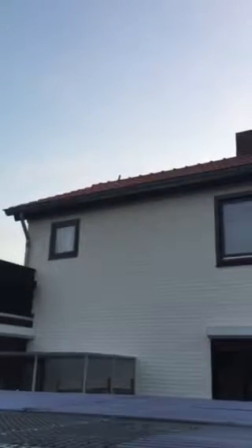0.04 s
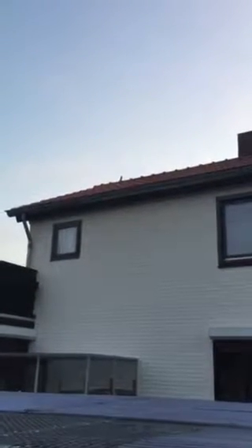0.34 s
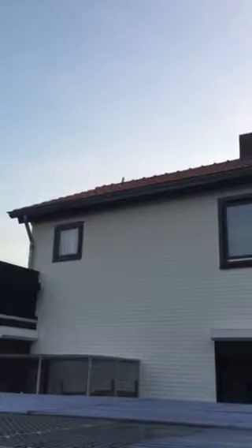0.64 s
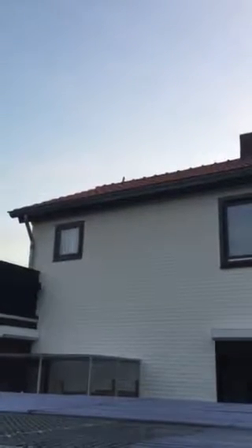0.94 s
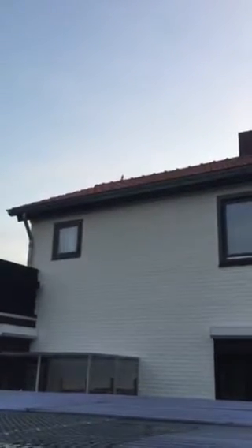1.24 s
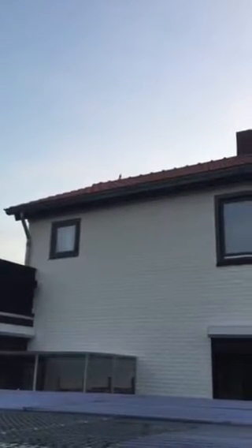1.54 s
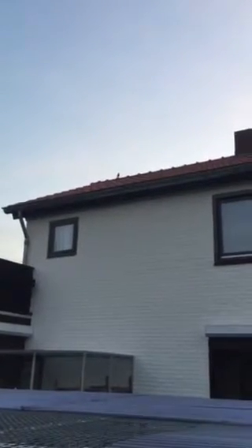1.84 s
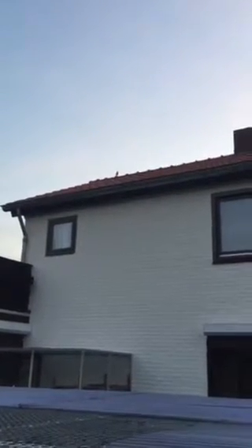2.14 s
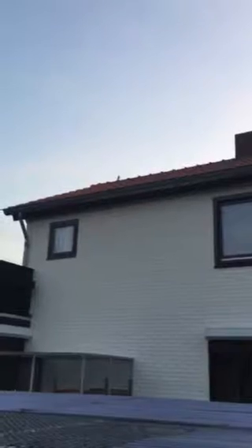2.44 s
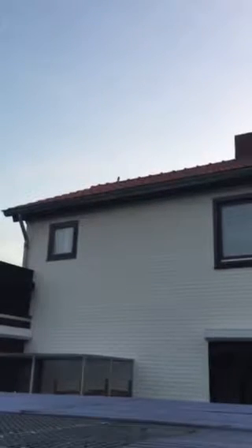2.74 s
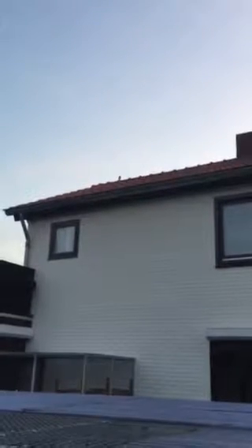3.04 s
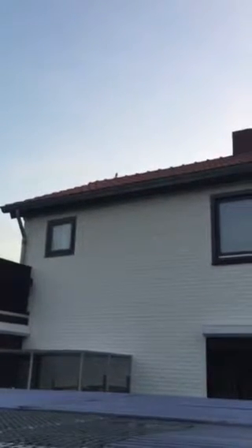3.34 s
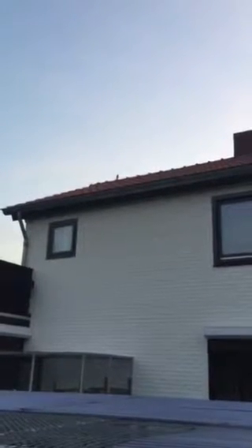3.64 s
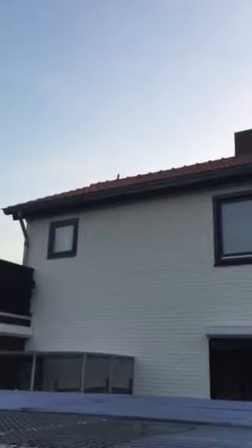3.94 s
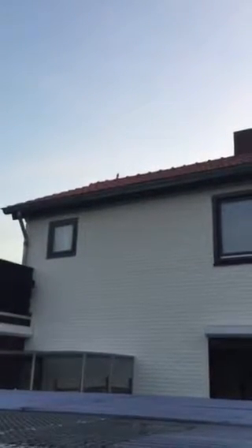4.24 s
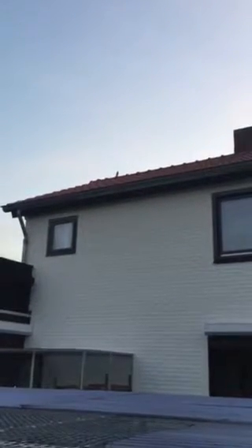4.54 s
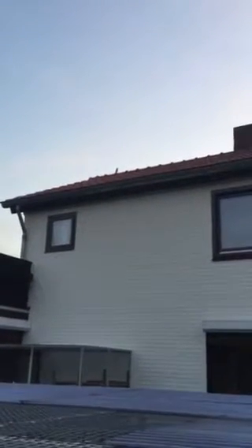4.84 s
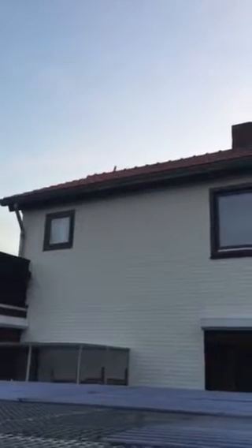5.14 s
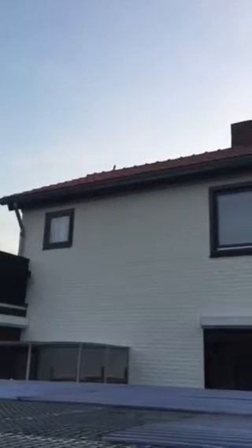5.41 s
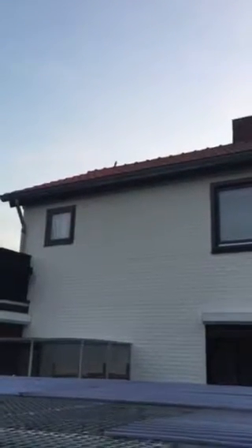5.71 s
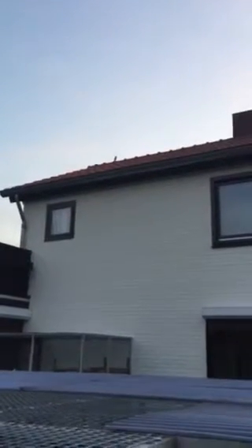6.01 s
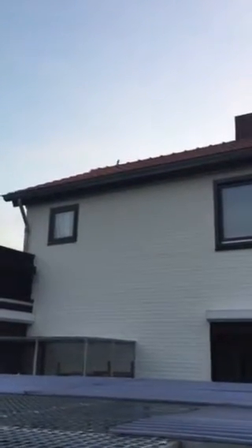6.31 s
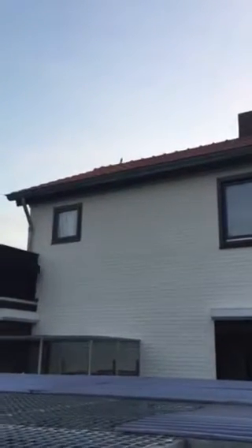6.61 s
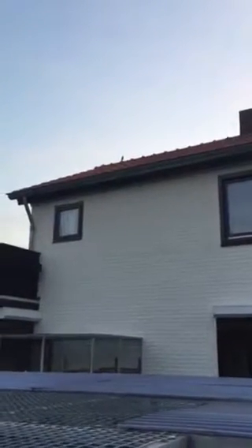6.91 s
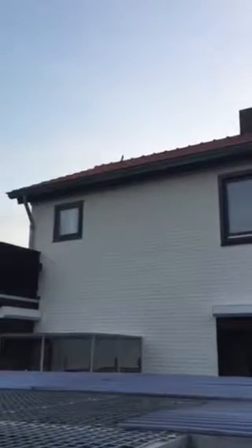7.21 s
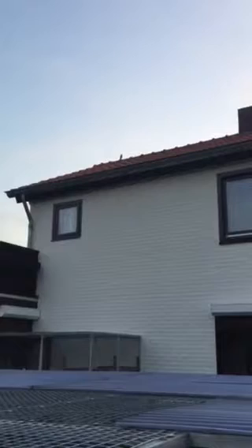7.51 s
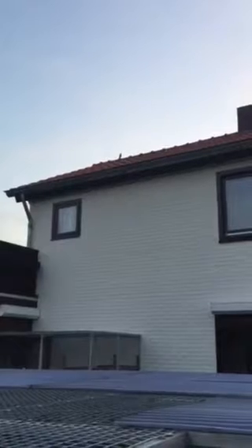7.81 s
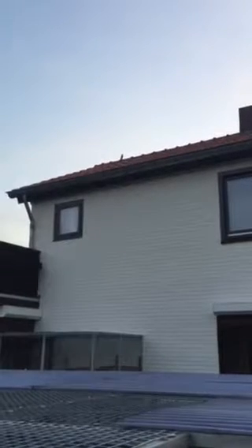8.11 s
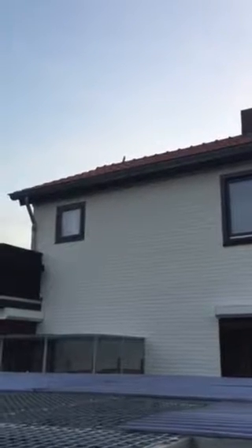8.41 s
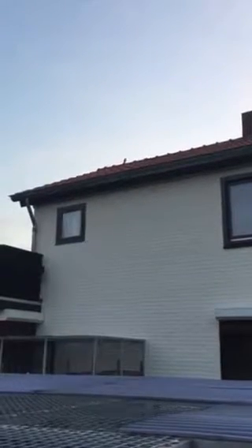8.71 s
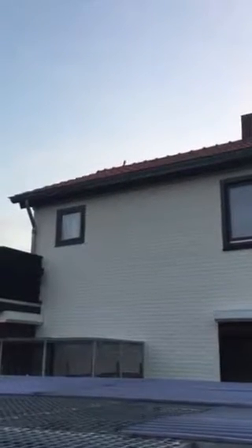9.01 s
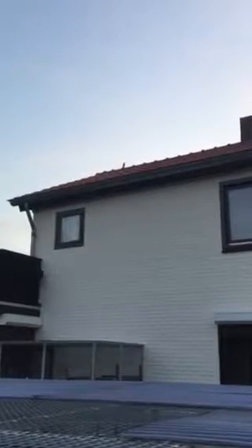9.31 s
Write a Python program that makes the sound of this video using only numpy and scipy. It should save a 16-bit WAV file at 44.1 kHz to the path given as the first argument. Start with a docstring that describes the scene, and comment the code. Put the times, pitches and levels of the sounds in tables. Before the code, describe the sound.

One songbird gives a varied song of whines, trills, chirps and soft whistles, lightly echoed by house walls, with a few dull bumps.

```python
"""A starling-like songbird on a house roof sings with the two sides of its syrinx, each an air-driven
oscillator. It opens with four nasal whines and a twitter, then twice sings rasps, a warble and chip trills.
Soft whistles enter; two runs of chirps climb into slurs and settle in a thin buzz; two hoots end the song.
Along the way come far purring notes, dull bumps on a hollow body and a faint scrape. Throughout, house
walls echo the song over the rumble of a quiet town."""
import sys
import numpy as np
from scipy import signal
from scipy.fft import rfft, irfft
from scipy.io import wavfile
from scipy.ndimage import uniform_filter1d

SR = 44100
rng = np.random.default_rng(int(sys.argv[2]) if len(sys.argv) > 2 else 0)


def to_wav(sig):
    """Store sig (one row per channel, or 1-D mono) as 16-bit WAV at the path in sys.argv[1].

    Samples outside -1..1 are clipped; the rate is SR.
    """
    pcm = np.clip(np.atleast_2d(sig), -1, 1) * 32767
    pcm = np.round(pcm).astype(np.int16)
    wavfile.write(sys.argv[1], SR, pcm.T)  # frames by channels


N = 417186
T = np.arange(N) / SR

# the motif of two rasps and a warble, sung twice: (start [s], level [dB])
MOTIFS = [(2.572, -1), (3.741, -2)]


def whines(push=3.6, brighten_db=6, flicker_db=2.2, onset_jitter=0.035, lock_s=0.06, coupling=0.2):
    """Source and filter: the throat shapes a buzzing tone that is rough until the membranes lock in."""
    # (start [s], crest [s], end [s], crest pitch [Hz], end pitch [Hz], bend of the fall [exponent],
    #  throat tuning [ratio], level [dB], second voice [dB])
    notes = [(.222, .34, .43, 915, 760, 2.6, 1.1, -48, -15), (.518, .62, .895, 1014, 815, 1.2, 1, -46, -10),
             (1.028, 1.145, 1.268, 944, 660, 2.7, 1.1, -48.5, -17),
             (1.378, 1.485, 1.675, 1002, 830, 1.6, 1, -46.5, -7)]
    # resonances of throat and beak: (frequency [Hz], gain [dB])
    throat = [(1000, -36), (1850, -11.5), (2600, -7), (3100, -5), (4150, -3.5), (5050, -18.5),
              (6200, -21.5), (7900, -17), (10300, -37.5), (12300, -22.5), (15000, -48)]
    out = np.zeros(N)
    for start, crest, end, top_hz, last_hz, bend, tuning, db, second_db in notes:
        t, hz = arch(start, crest, end, 0.76 * top_hz, top_hz, last_hz, bend)
        effort = hz / top_hz  # air pressure lifts pitch, loudness and brightness together
        stretch = tuning * effort ** 0.55  # the throat retunes for the lower five harmonics
        partials_db = []
        for k in range(1, 15):
            throat_db = 20 * np.log10(spectrum_gain(k * hz / (stretch if k < 6 else 1), throat))
            tilt_db = brighten_db * max(k - 4, 0) * (effort - 1)
            partials_db.append(throat_db + tilt_db + flicker_db * wander(len(t), 45))
        voice = syrinx(hz, partials_db, jitter=0.004 + onset_jitter * np.exp(-(t - start) / lock_s))
        second = syrinx(3880 * tuning * np.sqrt(effort), [second_db])
        voice += second * (1 + 2 * coupling * np.sin(phase_of(hz)))  # one side shakes the other
        roughness = 1 + 0.15 * wander(len(t), 500)
        add(out, start, voice * roughness * undb(db) * effort ** push * gate(t, 0.018))
    return out


def chirps(push=3.03, length_s=0.056, easy_hz=2320, easy_db=-59.5, db_per_octave=10):
    """Beating: two voices an octave apart slip out of tune on the rise, when slack and when forced."""
    # two climbing runs: (crest [s], nominal crest pitch [Hz], upper voice boost [dB], catch depth [0-1])
    notes = [(5.019, 1962, 10, 0.02), (5.15, 2230, -2, 0.08), (5.27, 2203, 3.5, 0.57),
             (5.387, 2113, 5.5, 0.1), (5.495, 2325, 18.5, 0), (5.581, 2524, 17.5, 0),
             (5.671, 2830, 18.5, 0.03), (6.856, 1950, 8.5, 0), (7.052, 2190, -7, 0.1),
             (7.209, 2320, 10.5, 0.96), (7.364, 2300, 9.5, 0.8), (7.478, 2200, 8, 0.07),
             (7.58, 2358, 13.5, 0.1), (7.67, 2572, 19.5, 0), (7.761, 2770, 19.5, 0)]
    # the eight partials in the order of duet(): (level [dB])
    duet_db = [2, 0, 0.5, 4.5, -8, -7.5, -16.5, -10.5]
    out = np.zeros(N)
    for crest, top_hz, boost_db, catch in notes:
        force = np.interp(top_hz, [2300, 2590], [0, 1])  # higher chirps are pushed harder
        slack = np.interp(top_hz, [1970, 2150], [0.07, 0])
        db = easy_db + db_per_octave * np.log2(top_hz / easy_hz)
        rise_s = np.interp(force, [0, 1], [0.032, 0.016])
        start = crest - rise_s
        t, hz = arch(start, crest, start + length_s, 0.5 * top_hz, top_hz, 0.72 * top_hz, 1.8)
        effort = hz / top_hz
        # a catch in the voice just before the crest dips level and pitch
        choke = catch * np.exp(-((t - crest + 0.0103) / 0.0041) ** 2)
        valve = gate(t, 0.0048) * (1 - choke)
        hz = hz * (1 - 0.087 * choke)
        rising = np.maximum((crest - t) / rise_s, 0) ** 2
        low_hz = hz * (1 + slack + 0.11 * force + 0.3 * rising)
        high_hz = 2 * hz * (1 + 0.025 * force * wander(len(t), 416))
        partials_db = list(duet_db)
        partials_db[1] += boost_db * effort ** 5  # the throat shapes the upper voice near the crest
        voice = duet(low_hz, high_hz, partials_db, jitter=0.008 + 0.022 * rising)
        add(out, start, voice * undb(db) * effort ** push * valve)
    return out


def slurs(low_ratio=0.578, leap_s=0.0174):
    """Combination tones: two voices leap, sag and rise together; the weak lower one adds sum tones."""
    # (start [s], end [s], crest [Hz], trough [Hz], end pitch [Hz], level [dB], lower re upper voice [dB])
    notes = [(5.755, 5.83, 6720, 5970, 7000, -40, -18), (5.883, 5.962, 7160, 6420, 7600, -43, -15.5),
             (7.838, 7.919, 6540, 5510, 7430, -40, -18.5), (7.97, 8.053, 7240, 6240, 7430, -43, -15.5)]
    out = np.zeros(N)
    for start, end, crest_hz, trough_hz, last_hz, db, low_db in notes:
        t, base_hz = arch(start, start + 0.67 * (end - start), end, trough_hz, trough_hz, last_hz, 1)
        lift = np.sin(np.pi / 2 * np.interp(t, [start, start + leap_s, (start + end) / 2], [0, 1, 2]))
        leap_hz = crest_hz * (0.6 + 0.4 * lift)
        sag_hz = base_hz + (crest_hz - trough_hz) * lift ** 2
        hz = np.where(t < start + leap_s, leap_hz, sag_hz)
        voice = duet(hz * low_ratio, hz, [low_db, 0, low_db, low_db - 3, -25, low_db - 13])
        add(out, start, voice * undb(db - lift) * gate(t, 0.0088))
    return out


def chips(top_hz=5680, length_s=0.015, lag_s=0.0034, period_s=0.02, answer_s=0.085, step_db=-3.5):
    """Two independent oscillators: one side sings a tiny arch while the other flicks steeply upward."""
    # three chips and a fading answer: (start [s], level [dB], chips in the answer [count])
    trills = [(2.968, -39, 2), (3.16, -39.5, 2), (4.141, -41.5, 2), (4.373, -43.5, 3)]
    out = np.zeros(N)
    for first, trill_db, answers in trills:
        call = [(k * period_s, 0) for k in range(3)]
        answer = [(answer_s + k * period_s, k * step_db) for k in range(answers)]
        for offset_s, drop_db in call + answer:
            start, db = first + offset_s, trill_db + drop_db
            crest_hz = top_hz * (1 + 0.018 * rng.standard_normal())
            t, hz = arch(start, start + length_s / 2, start + length_s,
                         0.83 * crest_hz, crest_hz, 0.78 * crest_hz, 3.1)
            add(out, start + lag_s, undb(db) * syrinx(hz, [0, -20]) * gate(t, 0.0049))
            t, flick_hz, gain = gesture([(start, crest_hz, -4), (start + 0.0051, 1.28 * crest_hz, -4),
                                         (start + 0.012, 1.783 * crest_hz, -12)])
            add(out, start, undb(db) * gain * syrinx(flick_hz, [0, -24]))
    return out


def twitters(swell=0.37):
    """Frequency sweeps: fast, nearly pure slides, each swelling to its middle and dying away."""
    # (start [s], end [s], first pitch [Hz], last pitch [Hz], bend [exponent], level [dB])
    slides = [(1.873, 1.91, 5600, 4050, 2.8, -44.5), (1.903, 1.918, 2270, 4450, 3.9, -40),
              (1.969, 1.984, 3500, 4600, 2.2, -49), (1.984, 1.99, 3150, 4600, 4, -38.5),
              (1.998, 2.01, 3140, 5340, 1.84, -42), (2.017, 2.042, 6220, 4400, 3.4, -39),
              (2.068, 2.1, 5750, 8450, 0.22, -40), (2.1, 2.125, 8200, 5010, 2.3, -35.5),
              (2.193, 2.241, 9600, 7030, 0.55, -46.5)]
    out = np.zeros(N)
    for start, end, first_hz, last_hz, bend, db in slides:
        t, hz = glide(start, end, first_hz, last_hz, bend)
        envelope = abs(np.sin(np.linspace(0, np.pi, len(t)))) ** swell
        add(out, start, undb(db) * envelope * syrinx(hz, [0, -20, -34], jitter=0.0078))
    return out


def rasps(push=2.2):
    """Harmonic series: strong overtones on a weak fundamental make short harsh notes that sag in pitch."""
    # timed from the start of the motif: (start [s], crest [s], end [s], crest pitch [Hz], level [dB])
    notes = [(-.002, 0.02, 0.07, 1200, -52), (0.082, 0.106, .15, 1353, -49)]
    # harmonics from the fundamental upward: (level [dB])
    harmonics_db = [-29.5, -4, -5, 4, -7, -9, -18]
    out = np.zeros(N)
    for motif_s, motif_db in MOTIFS:
        for start, crest, end, top_hz, db in notes:
            t, hz = arch(start, crest, end, 0.98 * top_hz, top_hz, 0.65 * top_hz, 1.8)
            envelope = undb(db + motif_db) * (hz / top_hz) ** push * gate(t, 0.027)
            add(out, motif_s + start, envelope * syrinx(hz, harmonics_db))
    return out


def warbles(after_s=0.238, period_s=0.0193, db=-40):
    """Biphonation: three falling two-voiced pulses end the motif, each a little higher than the last."""
    # the first six partials in the order of duet(): (level [dB])
    duet_db = [-14, -1, -10.5, -15, -23, -28]
    out = np.zeros(N)
    for motif_s, motif_db in MOTIFS:
        for k in range(3):
            start = motif_s + after_s + k * period_s
            knee_hz = 2810 + k * 130
            t, hz = arch(start, start + 0.0044, start + 0.024, 2.2 * knee_hz, knee_hz, 0.68 * knee_hz, 1.47)
            voice = duet(1.13 * hz, 2 * hz, duet_db, jitter=0.0225)
            add(out, start, undb(db + motif_db) * gate(t, 0.0071) * voice)
    return out


def buzzes(rate_hz=128, swing_hz=480, sag_db_per_s=-18, flutter_db=3.5):
    """Frequency and amplitude modulation: a high tone shaken fast, loudest at the bottom of each swing."""
    # (start [s], end [s], first pitch [Hz], settled pitch [Hz], level [dB])
    notes = [(6.013, 6.131, 8730, 7010, -50), (6.131, 6.216, 7500, 7200, -49.5),
             (6.226, 6.301, 7700, 7520, -49.5), (8.108, 8.203, 9140, 7580, -50),
             (8.204, 8.406, 7780, 7260, -49.5)]
    out = np.zeros(N)
    for start, end, first_hz, last_hz, db in notes:
        t, hz = glide(start, end, first_hz, last_hz, bend=4.2)
        swing = np.sin(phase_of(rate_hz * (1 + 0.058 * wander(len(t), 37))))
        throb = undb(-7.5 * (swing + 0.5))
        gain = undb(db + sag_db_per_s * (t - start) + flutter_db * wander(len(t), 53)) * gate(t, 0.011)
        carrier_hz = hz * (1 + 0.0196 * wander(len(t), 54.6))
        add(out, start, gain * throb * syrinx(carrier_hz + swing_hz * swing, [0, -30]))
    return out


def whistles(swell_share=0.09):
    """Sinusoidal oscillation: the other side of the syrinx slides onto soft tones, some under the chirps."""
    # (start [s], end [s], first pitch [Hz], held pitch [Hz], level [dB])
    notes = [(4.433, 4.666, 1430, 1928, -62), (4.729, 4.841, 2270, 2165, -58),
             (4.871, 4.953, 1894, 1850, -60), (5.357, 5.434, 3200, 1918, -53.5),
             (5.481, 5.704, 2482, 2806, -56.5), (5.886, 5.925, 2490, 2460, -52)]
    out = np.zeros(N)
    for start, end, first_hz, last_hz, db in notes:
        t, hz = glide(start, end, first_hz, last_hz, bend=2.6)
        swell = 1 - np.exp(-np.linspace(0, 1, len(t)) / swell_share)
        add(out, start, undb(db) * swell * gate(t, 0.014) * syrinx(hz, [0], jitter=0.015))
    return out


def hoots(dip_per_s=3.4, upper_ratio=1.605, upper_share=0.67, sum_db=-17, jitter=0.013):
    """Biphonation: over a mellow arch the other side sings higher, adds a sum tone and stops sooner."""
    # (start [s], end [s], crest pitch [Hz], level [dB], upper re lower voice [dB])
    notes = [(0.158, 0.197, 3010, -55, -36), (5.174, 5.255, 2267, -59, -30), (6.257, 6.32, 3236, -61, -28),
             (9.191, 9.288, 3470, -54.5, -1), (9.371, 9.409, 2610, -51, -31)]
    out = np.zeros(N)
    for start, end, top_hz, db, upper_db in notes:
        foot_hz = top_hz * (1 - dip_per_s * (end - start))  # longer arches are deeper
        for ratio, share, voice_db in (1, 1, db), (upper_ratio, upper_share, db + upper_db):
            stop = start + share * (end - start)
            t, hz = arch(start, (start + end) / 2, stop, foot_hz, top_hz, foot_hz, 1.9)
            voice = syrinx(ratio * hz, [0], jitter)
            sum_tone = (ratio > 1) * syrinx((ratio + 1) * hz, [sum_db], jitter)
            add(out, start, undb(voice_db) * gate(t, 0.0055) * (voice + sum_tone))
    return out


def syrinx(hz, partials_db, jitter=0.016):
    """Harmonic oscillation with a slightly unsteady pitch; the throat delays each harmonic differently."""
    phase = phase_of(hz * (1 + jitter * wander(len(hz), 900)))
    return np.sqrt(2) * sum(undb(db) * np.sin(k * phase + k * k) * (k * hz < SR / 2)
                            for k, db in enumerate(partials_db, 1))


def duet(low_hz, high_hz, partials_db, jitter=0.015):
    """Nonlinear coupling: both sides of the syrinx share one airflow, so octaves and sum tones arise."""
    shake = 1 + jitter * wander(len(low_hz), 900)
    low, high = phase_of(low_hz * shake), phase_of(high_hz * shake)
    phases = low, high, 2 * low, low + high, 2 * high, 2 * low + high, low + 2 * high, 2 * (low + high)
    return np.sqrt(2) * sum(undb(db) * np.sin(phase) for phase, db in zip(phases, partials_db))


def hoarse(voice, db):
    """Modulated flow noise: the vibrating membranes chop the airflow into a hiss that follows the voice."""
    # air rushing out of the beak: (frequency [Hz], gain [dB])
    air_spectrum = [(2000, -18.5), (5500, -2.5), (13000, -4)]
    hiss = colour(abs(voice) * rng.standard_normal(N), air_spectrum)
    return voice + undb(db) * np.std(voice) * unit_rms(hiss)


def beak(voice):
    """Cavity resonance: the beak colours the treble of the sharp notes."""
    # beak response: (frequency [Hz], gain [dB])
    resonances = [(9000, 0.5), (10400, -14.5), (11900, 2.5), (15000, 1)]
    return colour(voice, resonances)


def yard(song, t60=0.62, wet_db=-17, smear_s=0.007):
    """Reflection: walls return slightly smeared echoes and a diffuse tail, both with weakened treble."""
    # echoes from house walls: (delay [s], level [dB])
    echoes = [(0.071, -30.5), (0.165, -26)]
    t = T[:SR]
    response = undb(wet_db) * unit_rms(rng.standard_normal(SR) * undb(-60 * t / t60) * (t > 0.008))
    for delay, db in echoes:
        response += undb(db) * unit_rms(rng.standard_normal(SR) * np.exp(-abs(t - delay) / smear_s))
    wet = signal.fftconvolve(song, response / np.sqrt(SR))[:N]
    return colour(wet, [(3500, 6.5), (5500, 2.5), (7500, -3), (12000, -3.5)])


def purrs(swing_hz=330, rise_share=0.66, throb_db=4):
    """Frequency modulation: far notes purr and waver, loudest at the top of each swing."""
    # (start [s], end [s], first pitch [Hz], last pitch [Hz], first level [dB], last level [dB], rate [Hz])
    notes = [(0, 0.152, 2778, 2673, -56.5, -77, 25.5), (6.458, 6.612, 2190, 2710, -67.5, -60.5, 114),
             (6.943, 7.143, 2370, 2616, -74, -61, 105)]
    out = np.zeros(N)
    for start, end, first_hz, last_hz, first_db, last_db, rate_hz in notes:
        t, hz, gain = gesture([(start, first_hz, first_db), (end, last_hz, last_db)])
        swing = signal.sawtooth(phase_of(rate_hz * (1 + 0.076 * wander(len(t), 32))), rise_share)
        add(out, start, gain * undb(throb_db * swing) * syrinx(hz + swing_hz * swing, [0]))
    return out


def bumps(attack_s=0.005, spread_octaves=0.78):
    """Modal resonance: soft scuffing contacts on a hollow body each favour different damped modes."""
    # (time [s], level [dB], 30 dB decay of the scuff [s], ring [dB], most excited frequency [Hz])
    contacts = [(0.715, -61.5, 0.27, 17.5, 620), (0.758, -57.5, 0.11, 22.5, 600),
                (0.796, -58.5, 0.21, 24, 384), (5.309, -38.5, 0.11, -0.5, 394), (5.353, -53, 0.19, 12, 300)]
    # contact noise: (frequency [Hz], gain [dB])
    scuff_spectrum = [(50, -0.5), (500, -1), (1000, -5.5), (12000, -35), (20000, -100)]
    # the hollow body: (frequency [Hz], 60 dB decay [s], level [dB])
    body_modes = [(215, 0.029, 13), (405.8, 0.19, -8.5), (611, 0.1, -3)]
    out, t = np.zeros(N), T[:SR // 2]
    onset = 1 - np.exp(-(t / attack_s) ** 2)
    for start, db, decay_s, ring_db, contact_hz in contacts:
        body = np.zeros(len(t))
        for hz, t60, mode_db in body_modes:
            excitation = 1 / (1 + (np.log2(hz / contact_hz) / spread_octaves) ** 2)
            body += excitation * undb(mode_db - 60 * t / t60) * np.sin(2 * np.pi * hz * t)
        scuff = noise(len(t), scuff_spectrum) * undb(-30 * t / decay_s)
        add(out, start - attack_s, undb(db) * (scuff + undb(ring_db) * body) * onset)
    return out


def scrape(width_s=0.068):
    """Friction noise: a soft dull rub nearby swells and fades."""
    # (peak time [s], level [dB])
    rubs = [(2.507, -68)]
    envelope = sum(undb(db) * np.exp(-((T - peak_s) / width_s) ** 2) for peak_s, db in rubs)
    return envelope * noise(N, [(200, -1), (1500, 6), (5000, -47)])


def town(db=-69, flicker_db=2):
    """Ambient noise: steady distant hiss lies over an uneven low rumble that swells and ebbs."""
    # the distant town: (frequency [Hz], gain [dB])
    town_spectrum = [(18, -56), (35, -8), (70, 5), (190, -3), (1400, -19), (2120, -14.5), (5580, -25),
                     (15500, -31)]
    # course of the rumble, taken about its median: (time [s], level [dB])
    rumble_levels = [(0.0, -61), (3.79, -63.5), (5.87, -60.5), (8.2, -63.5)]
    air = undb(db) * noise(N, town_spectrum)
    low = colour(air, [(250, 5), (700, -75)])
    swell_db = np.interp(T, *np.transpose(rumble_levels))
    swell = undb(swell_db - np.median(swell_db) + flicker_db * wander(N, 7.6))
    return air + low * (swell - 1)


def arch(start, crest, end, first_hz, crest_hz, last_hz, bend):
    """Pitch contour: times and pitch along a parabola to the crest, then a power law to the end."""
    t = np.arange(start, end, 1 / SR)
    before = np.clip((crest - t) / (crest - start), 0, 1)
    after = np.clip((t - crest) / (end - crest), 0, 1)
    return t, crest_hz + (first_hz - crest_hz) * before ** 2 + (last_hz - crest_hz) * after ** bend


def glide(start, end, first_hz, last_hz, bend):
    """Glissando: times and pitch of a slide; a bend over 1 moves early and settles, under 1 moves late."""
    t = np.arange(start, end, 1 / SR)
    return t, last_hz + (first_hz - last_hz) * np.linspace(1, 0, len(t)) ** bend


def gesture(rows):
    """Smoothing: muscles round each (time [s], pitch [Hz], level [dB]) corner; gives times, pitch, gain."""
    times, hz, db = np.transpose(rows)
    t = np.arange(times.min(), times.max(), 1 / SR)
    hz, gain = (uniform_filter1d(np.interp(t, times, curve), size=110) for curve in (hz, undb(db)))
    return t, hz, gain * gate(t, 0.0023)


def gate(t, fade_s):
    """Amplitude envelope: the air valve opens and closes smoothly."""
    return np.sin(np.pi / 2 * np.clip(np.minimum(t - t[0], t[-1] - t) / fade_s, 0, 1)) ** 2


def phase_of(hz):
    """Phase in radians is the time integral of angular frequency."""
    return 2 * np.pi * np.cumsum(hz) / SR


def wander(n, rate_hz):
    """Random modulation: straight lines between random values, with a spread near 1."""
    knots = rng.standard_normal(int(n * rate_hz / SR) + 2)
    return np.interp(np.arange(n) * rate_hz / SR, np.arange(len(knots)), knots)


def noise(n, points):
    """Coloured noise of rms 1 with a (frequency [Hz], gain [dB]) spectrum."""
    return unit_rms(colour(rng.standard_normal(n), points))


def colour(x, points):
    """Linear filtering: multiply the spectrum of x by a (frequency [Hz], gain [dB]) curve."""
    return irfft(rfft(x) * spectrum_gain(np.linspace(0, SR / 2, len(x) // 2 + 1), points), len(x))


def spectrum_gain(hz, points):
    """Frequency response: amplitude gain at hz of a (frequency [Hz], gain [dB]) curve."""
    knots_hz, db = np.transpose(points)
    return undb(np.interp(np.log(hz + 1), np.log(knots_hz), db))


def add(out, start, x):
    """Superposition: mix x into out from a start time in seconds."""
    i = int(start * SR)
    x = x[max(-i, 0):N - i]
    out[max(i, 0):max(i, 0) + len(x)] += x


def undb(db):
    """Decibels to amplitude ratio."""
    return 10 ** (np.asarray(db) / 20)


def unit_rms(x):
    """Normalisation to rms 1."""
    return x / np.sqrt(np.mean(x ** 2))


def scene():
    """Superposition: the song and its echoes, purrs blurred by distance, bumps, a scrape and the town."""
    nasal = hoarse(whines(), db=-30) + hoarse(rasps() + chirps(), db=-20)
    sharp = hoarse(chips() + warbles(), db=-18.5) + twitters() + slurs()
    song = nasal + beak(sharp) + buzzes() + whistles() + hoots()
    far = purrs()
    blur = yard(far, t60=0.2, wet_db=-8)
    return (song + yard(song) + far + blur + bumps() + scrape() + town())[None]


def record(dry):
    """Band limiting: a steep low-pass filter cuts the treble above 15850 Hz."""
    return signal.sosfilt(signal.ellip(10, 0.1, 70, 15850, fs=SR, output="sos"), dry)


dry = scene()
out = record(dry)
to_wav(out)
```